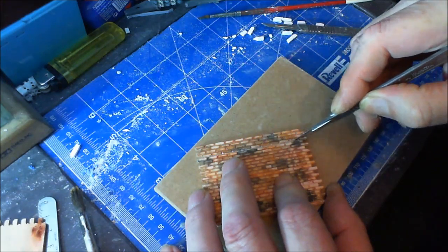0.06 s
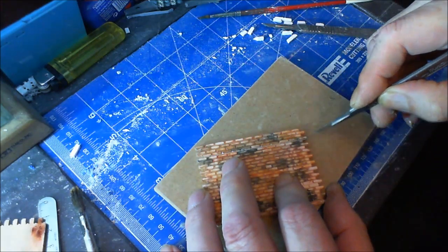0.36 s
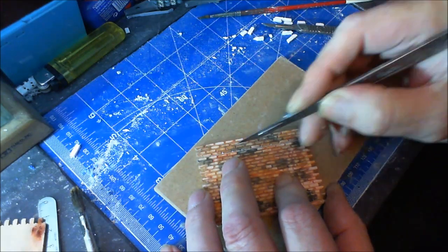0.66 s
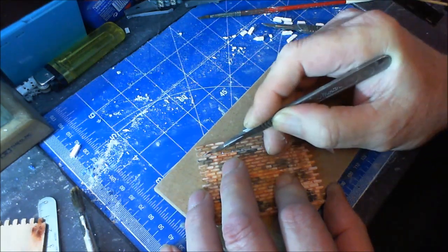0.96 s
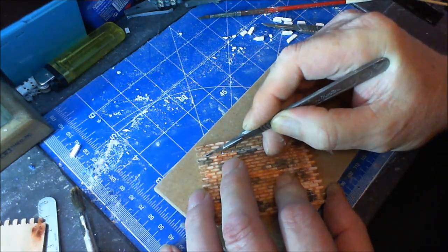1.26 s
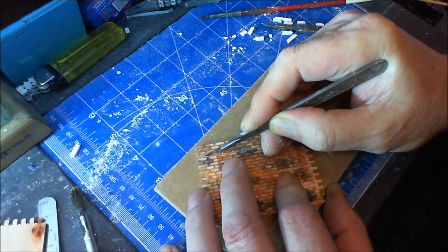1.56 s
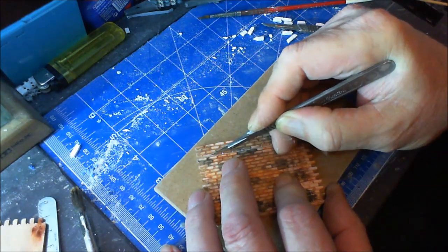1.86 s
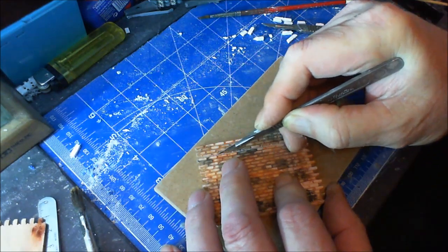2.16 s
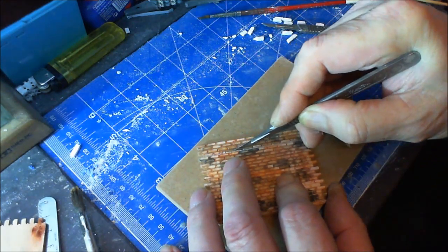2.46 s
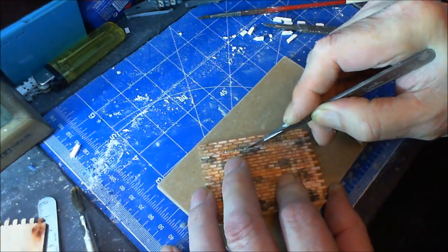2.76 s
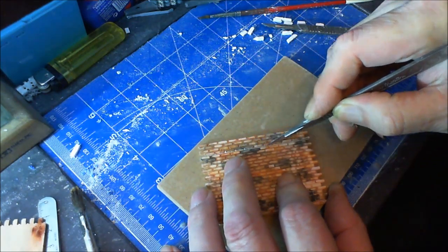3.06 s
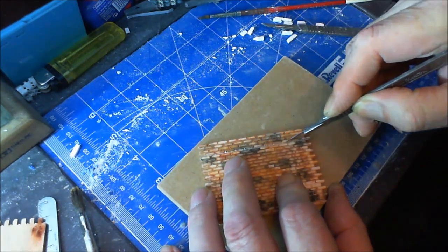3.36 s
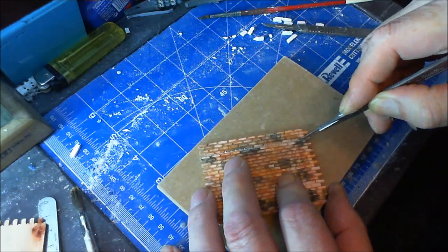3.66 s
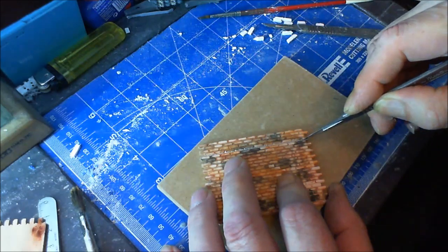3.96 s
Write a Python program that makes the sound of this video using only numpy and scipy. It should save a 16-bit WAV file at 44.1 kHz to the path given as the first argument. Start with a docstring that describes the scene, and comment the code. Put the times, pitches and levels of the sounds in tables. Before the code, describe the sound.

A craft knife picks at a small model wall on a board, slips with a sharp clack, then pecks, scratches and scrapes along it. The microphone is close, in a quiet room with faint hum and hiss.

```python
"""Craft knife on a model wall

A blade picks at a small model wall held on a board, close to a small camera in a quiet room.
It scrapes and ticks, slips off the edge with a sharp clack, pecks and scratches, then is drawn along
the wall. Taps and tiny slips over the grain ring the wall, the board and the steel. Under it lie
room rumble, hiss, hum and the thin chopped whine of the camera's electronics."""
import sys
import numpy as np
from scipy import signal
from scipy.fft import rfft, irfft
from scipy.io import wavfile
from scipy.ndimage import uniform_filter1d, map_coordinates

SR = 44100
rng = np.random.default_rng(int(sys.argv[2]) if len(sys.argv) > 2 else 0)


def wav_out(sig):
    """Save sig, one row per channel (or a flat mono array), as 16-bit PCM at SR to the path in sys.argv[1]."""
    wavfile.write(sys.argv[1], SR, np.round(np.clip(np.atleast_2d(sig).T, -1, 1) * 32767).astype(np.int16))


N = 176400
T = np.arange(N) / SR
EVENT_T = T[:SR // 4]
ATTACK_S, RELEASE_S = 0.0086, 0.014
WALL_HZ = 1548  # unbent wall pitch

# Modes of the wall and its board. Each row: frequency in Hz, width in Hz, level in dB.
WALL_MODES = [(948, 195, 2), (1352, 260, 8), (1604, 99, 1.5), (1980, 100, -9), (2450, 670, 0)]
BOARD_MODES = [(233, 60, -6), (348, 90, -8), (409, 56, 5.5), (455, 41, 2.5)]
# Steel click spectrum. Each row: frequency in Hz, level in dB.
CLICK_SPECTRUM = [(700, -3.5), (1800, -0.5), (2600, 3), (3600, 3.5), (4900, -5), (6500, 2), (8500, -3.5),
                  (11000, -2.5), (13000, -8), (16000, -31)]
# Blade taps. Each row: start in seconds, board knock in dB, wall ring in dB, click in dB.
BLADE_TAPS = [(0.0267, -66, -41, -29), (.079, -55, -36, -33), (0.1256, -56, -35.5, -41),
              (.164, -49, -41.5, -45), (0.279, -56, -52, -40.5), (.3082, -46, -27.5, -27),
              (0.364, -61, -32, -36), (1.829, -44, -41.5, -41), (2.09, -38, -63, -45),
              (2.152, -40.5, -46, -50), (2.207, -40.5, -44.5, -45), (2.234, -42.5, -62, -53),
              (2.2589, -41, -48, -32), (2.2939, -34.5, -52, -33), (2.314, -45, -46, -54),
              (2.340, -43.5, -43, -40), (2.356, -55, -48, -46), (2.384, -37.5, -45, -48),
              (2.404, -47, -45, -45), (2.436, -41.5, -41, -45), (2.454, -36, -39.5, -41.5),
              (2.471, -47, -39, -45), (2.7021, -39.5, -36, -36), (2.793, -44, -38.5, -44),
              (3.013, -46, -53, -38.5), (3.114, -42, -49, -55), (3.194, -46, -37, -41),
              (3.296, -44.5, -41, -39), (3.525, -46, -45, -44), (3.585, -68, -41, -39),]


def taps(rise_s=0.00056, t60_s=0.011):
    """The point clicks, rings the wall and knocks the board beneath."""
    out = np.zeros(N)
    for start_s, knock_db, ring_db, click_db in BLADE_TAPS:
        click = amp(click_db) * burst(CLICK_SPECTRUM, rise_s, t60_s)
        knock = amp(knock_db) * struck(BOARD_MODES)
        ring = amp(ring_db) * struck(WALL_MODES)
        add(out, start_s, click + knock + ring)
    return out


# Steel clash spectrum. Each row: frequency in Hz, level in dB.
CLASH_SPECTRUM = [(300, -9), (650, -15), (950, -11), (1500, -1.5), (1950, -2.5), (2800, -23), (4100, 0.5),
                  (4600, -11.5), (6500, -10.5), (7800, -7.5), (8400, 6.5), (9500, -9.5), (10300, -6),
                  (11500, -17), (12600, -3), (13500, -28), (16000, -10)]
# Modes of the worktop and the steel. Each row: frequency in Hz, width in Hz, level in dB.
WORKTOP_MODES = [(59, 11.4, -8.5), (253, 32, -11.5), (393, 43, -1.5)]
STEEL_MODES = [(4090, 51, -8.5), (8400, 35, 2), (10400, 55, -15), (12070, 59, -13)]
# Contacts as the knife slips. Each row: start in seconds, rise in seconds, level in dB.
SLIP_CONTACTS = [(0.311, 0.00043, -16), (0.3159, 0.00014, -12.5), (0.3176, 0.00035, -26),
                 (0.387, 0.0011, -30), (0.3912, 0.00035, -27)]


def clack(t60_s=0.013, thump_db=-26.5, steel_db=-31):
    """The knife slips off the edge; its hardest contact rings the steel and thumps the hollow worktop."""
    out = np.zeros(N)
    for start_s, rise_s, db in SLIP_CONTACTS:
        add(out, start_s, amp(db) * burst(CLASH_SPECTRUM, rise_s, t60_s))
    hardest_s = max(SLIP_CONTACTS, key=lambda row: row[2])[0]
    add(out, hardest_s, amp(thump_db) * struck(WORKTOP_MODES, scatter=0.0045, rise_s=0.0045))
    add(out, hardest_s, amp(steel_db) * struck(STEEL_MODES, scatter=0))
    return out


def skid(start_s=0.335, end_s=0.397, level_db=-49.5, fall_db=2, wall_db=-3):
    """The slipped blade skids on, rubbing steel against wall."""
    corners_s = [start_s - ATTACK_S, start_s, end_s, end_s + RELEASE_S]
    push = np.interp(T, corners_s, [0, 1, amp(-fall_db), 0])
    steel = colour(grains(), CLASH_SPECTRUM) + colour(grains(), CLICK_SPECTRUM)
    wall = amp(wall_db) * resonate(grains(), WALL_MODES)
    return amp(level_db) * push * (steel + wall)


# Grit spectrum. Each row: frequency in Hz, level in dB.
GRIT_SPECTRUM = [(800, -22), (2200, -10), (3200, 0.5), (5000, -3), (6300, -1), (8000, -1), (9500, -0.5),
                 (12000, -10.5), (16000, -23)]
# Scratches. Each row: start and length in seconds, level in dB, relative grit in dB, wall pitch in Hz.
BLADE_PUSHES = [(0.18, 0.13, -57, -4.5, 1580), (0.676, 0.18, -68, 2, 1520), (1.236, 0.054, -55.5, -7, 1610),
                (1.808, 0.071, -54.5, -1.5, 1530), (2.05, 0.1, -57.5, -3, 1540),
                (2.214, .27, -55.5, -6.5, 1470), (2.476, 0.051, -58, 5.5, 1730),
                (2.525, 0.11, -56.5, -4, 1620), (3.97, 0.027, -56.5, -2.5, 1460)]


def scratches(board_db=-2):
    """Short pushes of the blade: grit, with the wall and board sounding under it."""
    slips = grains()
    body_gain, grit_gain, bend = np.zeros(N), np.zeros(N), np.ones(N)
    for start_s, length_s, db, grit_db, hz in BLADE_PUSHES:
        attack = np.clip((T - start_s) / ATTACK_S, 0, 1)
        release = np.clip((start_s + length_s - T) / RELEASE_S + 0.5, 0, 1)
        push = amp(db) * attack * release
        body_gain += push
        grit_gain += push * amp(grit_db)
        bend[T >= start_s] = hz / WALL_HZ
    body = resonate(slips, WALL_MODES, bend) + amp(board_db) * board_drone(slips)
    return body_gain * body + grit_gain * colour(slips, GRIT_SPECTRUM)


# Blade modes before and after it turns. Each row: frequency in Hz, width in Hz, level in dB.
UNTURNED_MODES = [(3560, 960, 2.1), (6040, 800, 3)]
TURNED_MODES = [(2720, 84, -5), (3330, 130, 0), (6560, 210, -0.5), (7630, 300, 2.5), (10700, 470, -3)]
# Stroke breakpoints. Each row: time in seconds, wall, board and blade levels in dB, rasp pitch in Hz.
SHORT_STROKE = [(0, -52, -57, -67, 1550), (.13, -54, -61, -61, 1490), (.18, -58, -59, -77, 1480)]
LONG_STROKE = [(2.68, -59, -62, -66, 1560), (2.72, -61, -61, -61, 1500), (2.85, -57, -53.5, -61.5, 1560),
               (3.0, -52, -53, -59.5, 1680), (3.13, -52, -55, -61.5, 1590), (3.31, -51, -59, -65.5, 1630),
               (3.45, -54.5, -61, -59, 1570), (3.61, -48.5, -64, -61, 1490), (3.7, -56.5, -61, -65, 1510),
               (3.78, -67, -67, -80, 1420)]


def stroke(rows, turned, grit_db=-7, rasp_db=4.5, filter_width_hz=370):
    """The edge rasps along the wall; the blade's ring shifts as turned goes from 0 to 1."""
    times_s, *columns = np.transpose(rows)
    wall_db, board_db, blade_db, rasp_hz = [np.interp(T, times_s, column) for column in columns]
    slips = grains()
    blade = np.sqrt(1 - turned) * resonate(slips, UNTURNED_MODES)
    blade += np.sqrt(turned) * resonate(slips, TURNED_MODES)
    blade += amp(grit_db) * colour(grains(), GRIT_SPECTRUM)
    rasp = grains()
    for _ in range(2):  # two passes narrow the band
        rasp = resonate(rasp, [(WALL_HZ, filter_width_hz, 0)], rasp_hz / WALL_HZ)
    wall = unit(resonate(slips, WALL_MODES) + amp(rasp_db) * rasp)
    touching = (T > times_s[0]) * (T < times_s[-1])
    return touching * (amp(wall_db) * wall + amp(blade_db) * blade + amp(board_db) * board_drone(slips))


# Worktop boom. Each row: frequency in Hz, width in Hz, level in dB.
BOOM_MODES = [(98, 43, 0)]


def board_drone(slips, boom_db=-2):
    """The board drones under the rubbing and passes it to the worktop."""
    return resonate(slips, BOARD_MODES) + amp(boom_db) * resonate(slips, BOOM_MODES)


# Crumb modes. Each row: frequency in Hz, width in Hz, level in dB.
CRUMB_MODES = [(1540, 120, -2), (1850, 170, 6), (2310, 180, 2)]


def crumb_crunch(start_s=2.479, rise_s=0.0078, length_s=0.078, level_db=-44):
    """A dry crunch as the edge breaks through a crumb."""
    push = np.interp(T, [start_s, start_s + rise_s, start_s + length_s], [0, 1, 0]) ** 2
    return amp(level_db) * push * resonate(grains(), CRUMB_MODES)


# Whistle swells. Each row: peak time in seconds, level in dB.
WHISTLE_SWELLS = [(2.91, -67), (3.26, -68.5)]


def edge_whistle(hz=10420, width_hz=350, swell_s=0.12):
    """The sliding edge whistles faintly."""
    swell = sum(amp(db) * np.exp(-((T - peak_s) / swell_s) ** 2) for peak_s, db in WHISTLE_SWELLS)
    return swell * resonate(grains(), [(hz, width_hz, 0)])


def room_echo(x, level_db=-11, t60_s=0.19, delay_s=0.004):
    """The room answers with a short, darker tail."""
    noise = colour(rng.standard_normal(len(EVENT_T)), [(200, 6), (2000, 0), (14000, -3)])
    tail = noise * fade(t60_s) * (EVENT_T > delay_s)
    return amp(level_db) * signal.fftconvolve(x, tail / np.linalg.norm(tail))[:N]


# Room noise spectrum and hum tones. Each row: frequency in Hz, level in dB.
ROOM_SPECTRUM = [(10, 33), (36, 11), (50, 27), (66, 19.5), (130, 16.5), (220, 11.5), (320, 19.5),
                 (420, 10.5), (520, 13.5), (750, 9), (1100, 10), (1600, 7), (2200, -2), (3000, -3.5),
                 (5000, -5), (8000, -2.5), (10000, -4), (15500, 0)]
HUM_TONES = [(50, -57.5), (150, -67), (560, -72), (996, -66), (3892, -78), (14083, -76)]


def room_tone(noise_db=-52.5, drift_rad=0.91):
    """Rumble and hiss, with a hum that wavers in phase."""
    hum = sum(amp(db) * np.sin(2 * np.pi * hz * T + drift_rad * wobble(12)) for hz, db in HUM_TONES)
    return amp(noise_db) * colour(rng.standard_normal(N), ROOM_SPECTRUM) + np.sqrt(2) * hum


# Whine tones. Each row: frequency in Hz, level in dB.
WHINE_TONES = [(8000, -63.5), (8640, -62)]


def camera_whine(period_s=0.1, first_gap_s=0.064, gap_s=0.0175):
    """The electronics whine, dropping out ten times a second."""
    from_gap_s = np.abs((T - first_gap_s + period_s / 2) % period_s - period_s / 2)
    gate = uniform_filter1d((from_gap_s > gap_s / 2) * 1.0, size=90)
    return np.sqrt(2) * gate * sum(amp(db) * np.sin(2 * np.pi * hz * T) for hz, db in WHINE_TONES)


def grains(slips_per_s=1300, spread_db=3, clump_db=2, rub_gain=0.57):
    """Tiny slips of the edge over the grain, in clumps, on a smooth rub."""
    sizes = np.sign(rng.standard_normal(N)) * amp(spread_db * np.clip(rng.standard_normal(N), -2, 2))
    slips = unit((rng.random(N) < slips_per_s / SR) * sizes)
    rub = rub_gain * rng.standard_normal(N)
    return unit((slips + rub) * amp(clump_db * wobble(70)))


def struck(modes, scatter=0.046, rise_s=0.0015, spot_db=1.5):
    """One blow on a body, peak 1; each spot rings a little differently."""
    ring = 0
    for hz, width_hz, db in modes:
        decay = amp(db + rng.normal(0, spot_db)) * np.exp(-np.pi * width_hz * EVENT_T)
        spot_hz = hz * (1 + rng.normal(0, scatter))
        ring += decay * np.sin(2 * np.pi * (spot_hz * EVENT_T + rng.random()))
    ring *= 1 - np.exp(-EVENT_T / rise_s)
    return ring / np.abs(ring).max()


def burst(spectrum, rise_s, t60_s):
    """Coloured noise that rises and dies away."""
    noise = colour(rng.standard_normal(len(EVENT_T)), spectrum)
    return noise * (1 - np.exp(-EVENT_T / rise_s)) * fade(t60_s)


def resonate(x, modes, bend=1):
    """Ring the modes with x, to rms 1; bend scales their pitch."""
    clock_s = np.cumsum(bend * np.ones(len(x))) / SR
    out = 0
    for hz, width_hz, db in modes:
        carrier = np.exp(2j * np.pi * hz * clock_s)
        ring = signal.lfilter([1], [1, -np.exp(-np.pi * width_hz / SR)], x / carrier) * carrier
        out += amp(db) * np.sqrt(width_hz) * ring.imag
    return unit(out)


def colour(x, spectrum):
    """Shape x by (Hz, dB) points, to rms 1."""
    hz, db = np.transpose(spectrum)
    bins_hz = np.fft.rfftfreq(len(x), 1 / SR)
    gain = amp(np.interp(np.log(bins_hz + 1), np.log(hz), db))
    return unit(irfft(rfft(x) * gain, len(x)))


def fade(t60_s):
    """A quarter second of exponential decay."""
    return amp(-60 * EVENT_T / t60_s)


def wobble(rate_hz):
    """A smooth random curve."""
    return map_coordinates(rng.standard_normal(2000), [T * rate_hz], mode="wrap")


def add(track, start_s, sound):
    """Mix a sound into the track."""
    part = track[round(start_s * SR):][:len(sound)]
    part += sound[:len(part)]


def amp(db):
    """Decibels to gain."""
    return 10 ** (np.asarray(db) / 20)


def unit(x):
    """Scale to rms 1."""
    return x / np.sqrt(np.mean(x ** 2) + 1e-20)


def scene(mid_turn_s=3.31, turn_length_s=0.35):
    """Knife work and its echo over the background; the blade turns during the long stroke."""
    turned = np.clip((T - mid_turn_s) / turn_length_s + 0.5, 0, 1)
    knife = taps() + clack() + skid() + scratches() + crumb_crunch() + edge_whistle()
    knife += stroke(SHORT_STROKE, turned=0.94) + stroke(LONG_STROKE, turned)
    return (knife + room_echo(knife) + room_tone() + camera_whine())[None]


def record(dry, top_hz=15800, dc_offset=-0.0097):
    """The camera's band limit and small standing offset."""
    passband = np.fft.rfftfreq(N, 1 / SR) < top_hz
    return irfft(rfft(dry) * passband, N) + dc_offset


dry = scene()
out = record(dry)
wav_out(out)
```